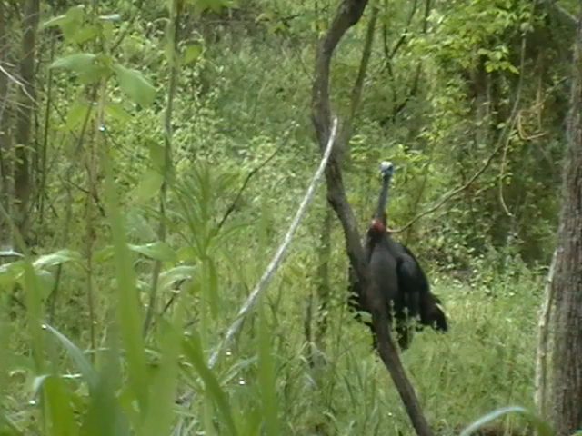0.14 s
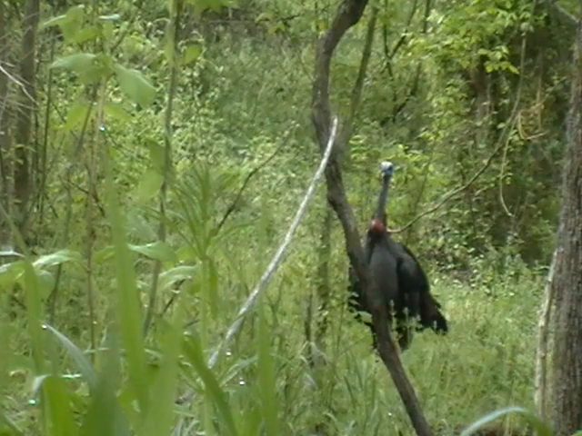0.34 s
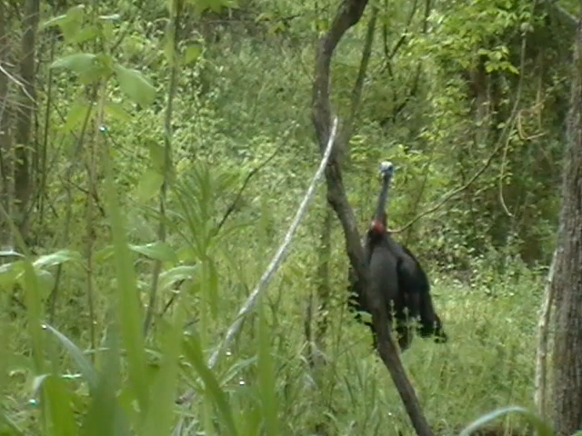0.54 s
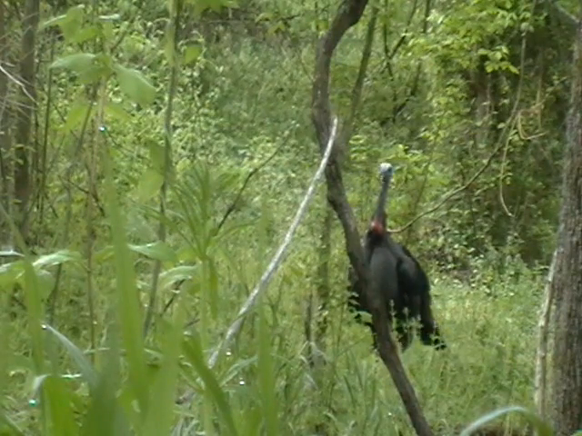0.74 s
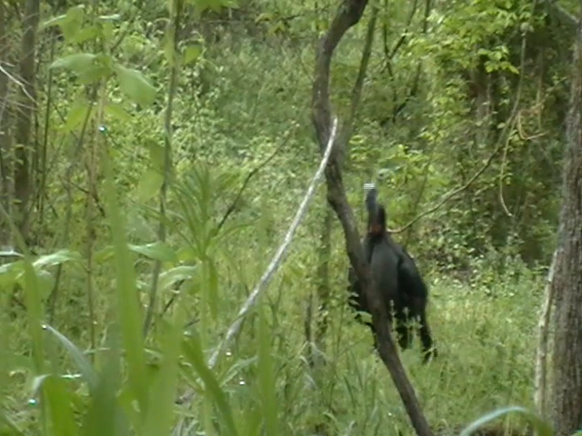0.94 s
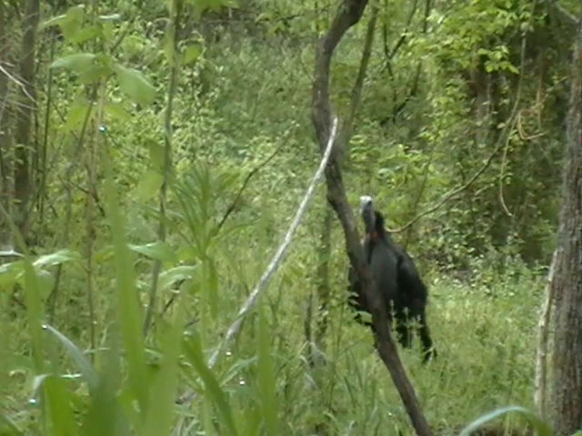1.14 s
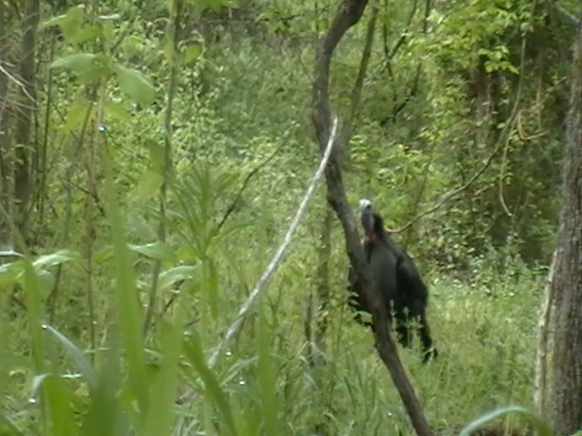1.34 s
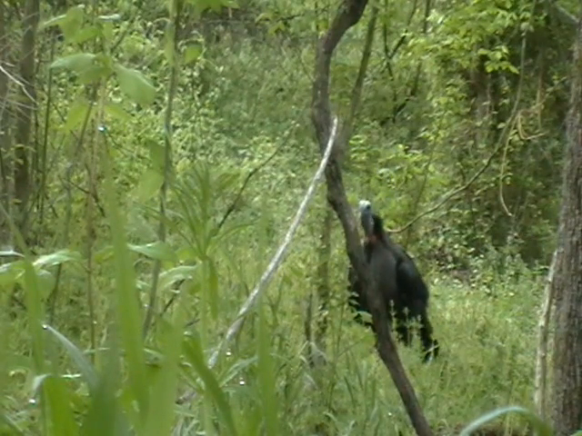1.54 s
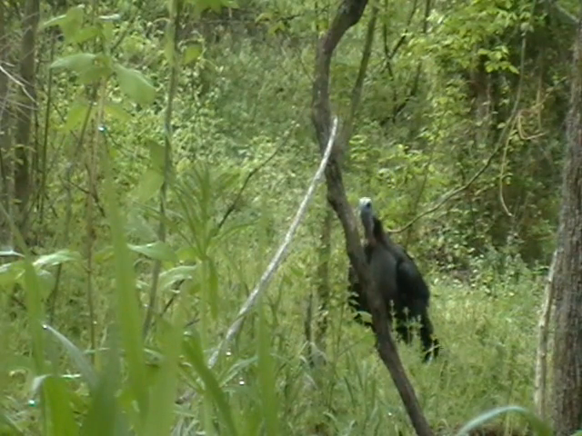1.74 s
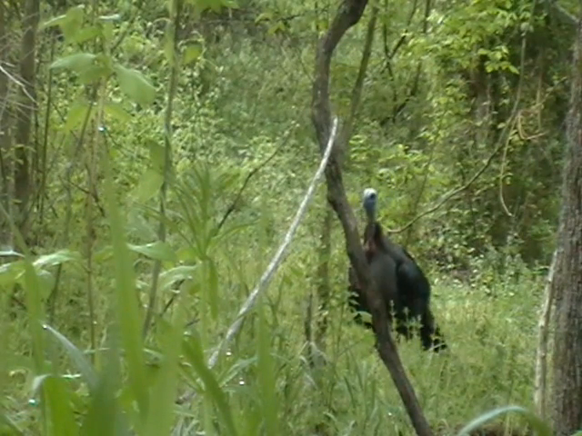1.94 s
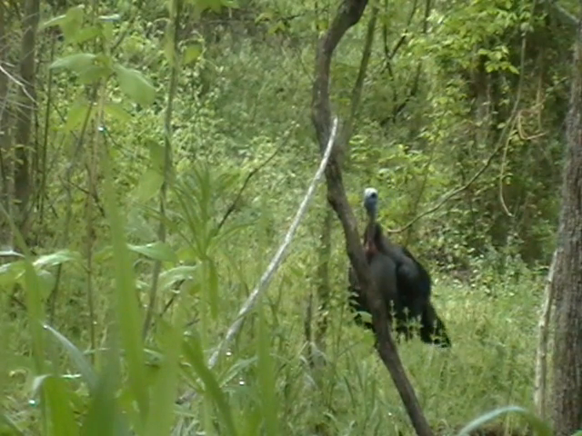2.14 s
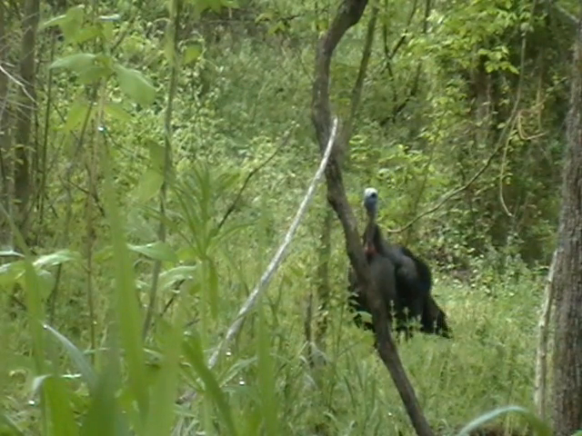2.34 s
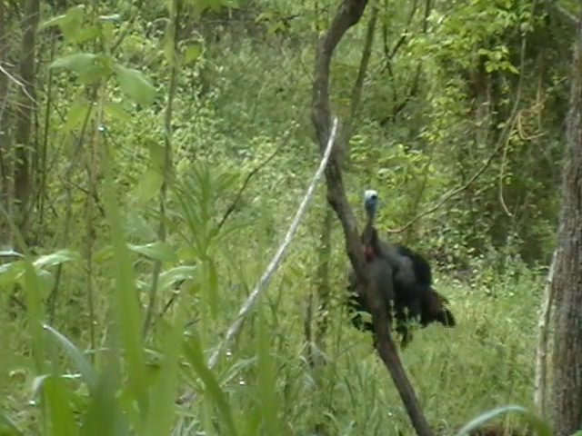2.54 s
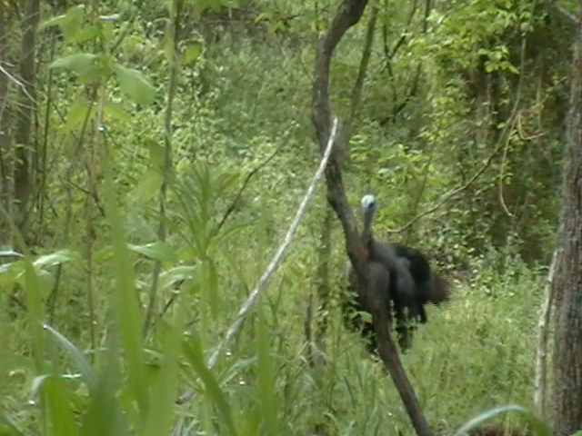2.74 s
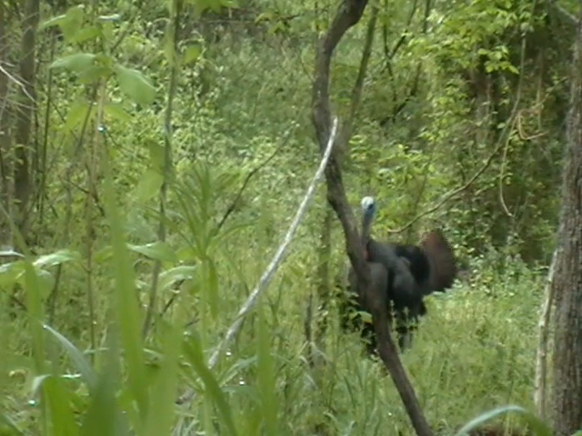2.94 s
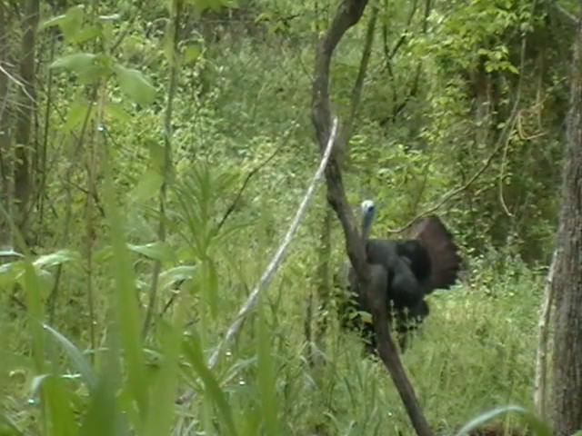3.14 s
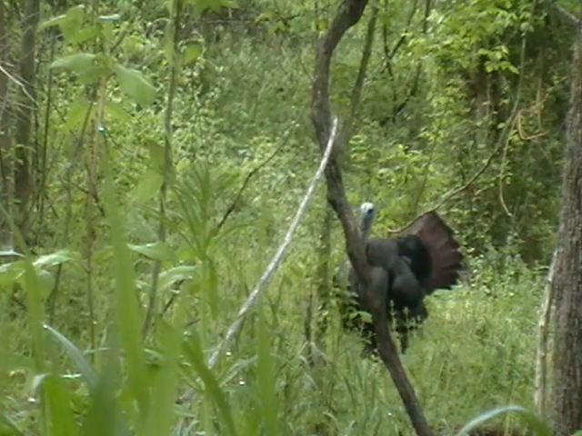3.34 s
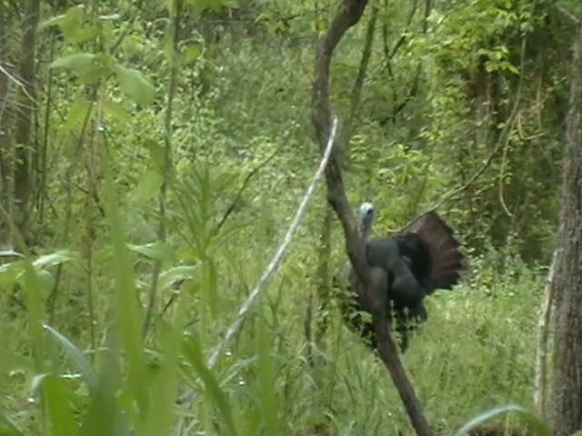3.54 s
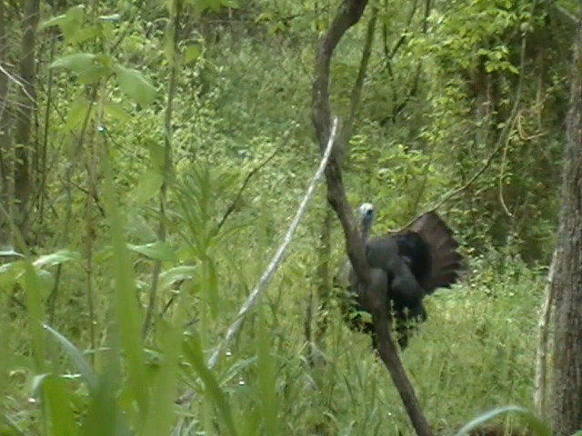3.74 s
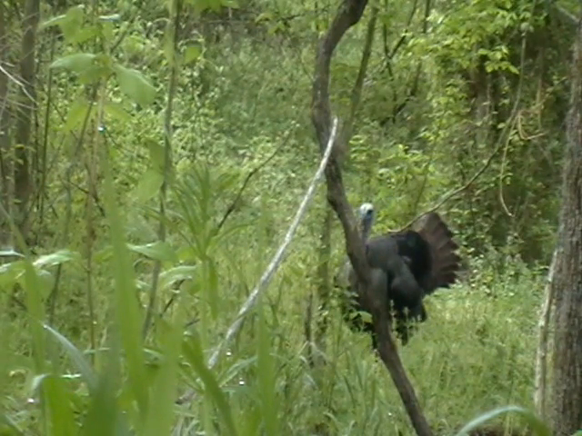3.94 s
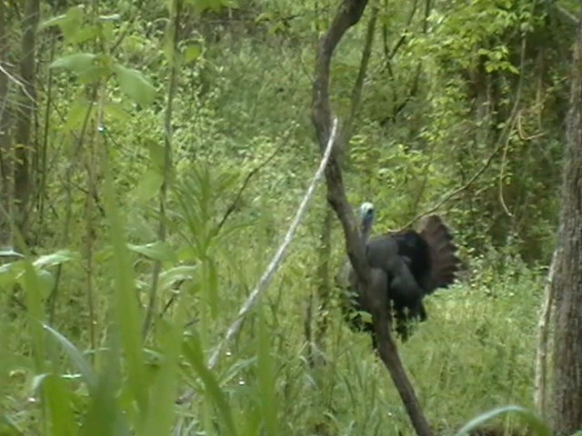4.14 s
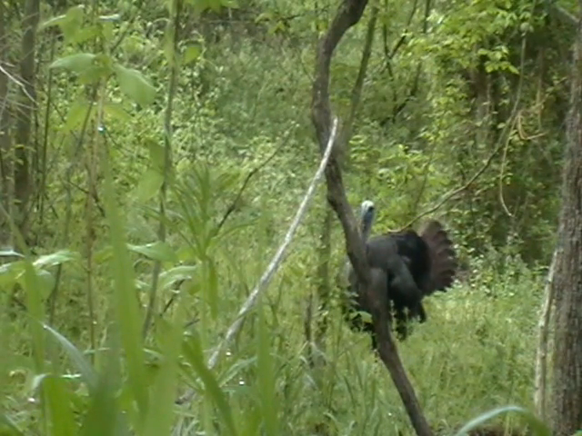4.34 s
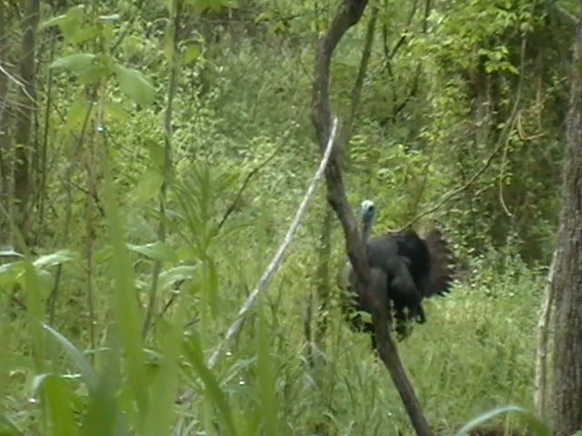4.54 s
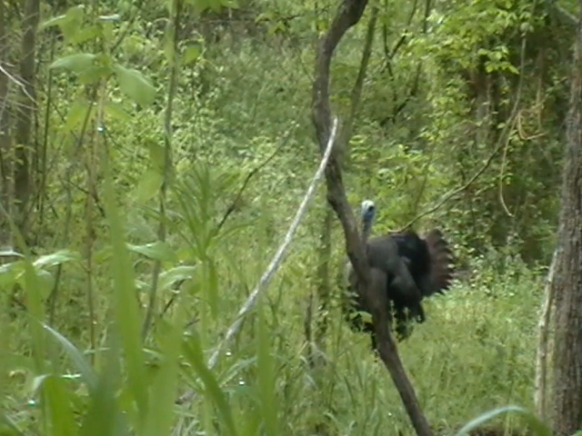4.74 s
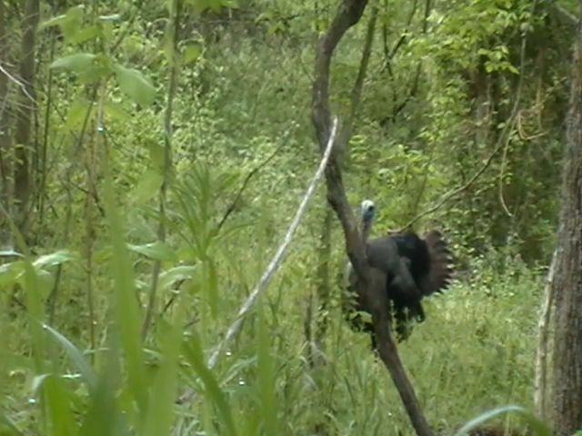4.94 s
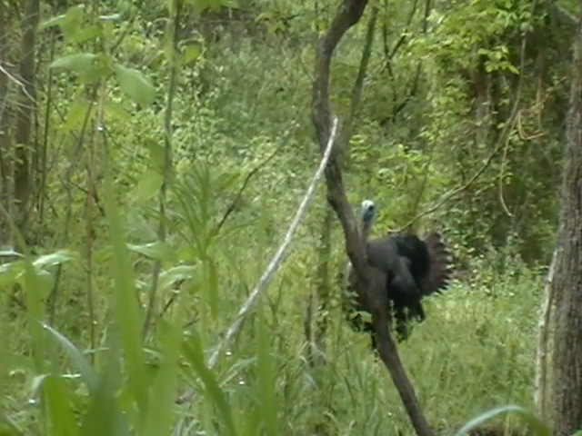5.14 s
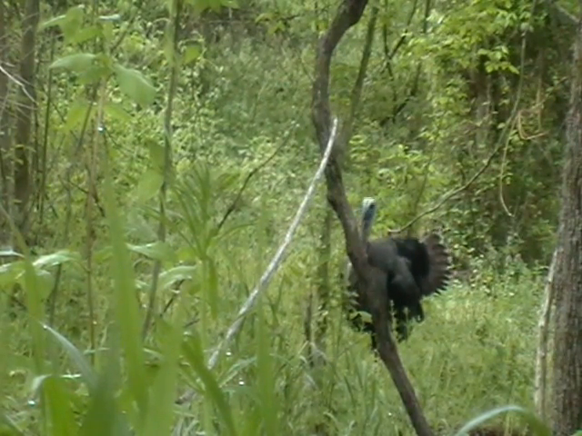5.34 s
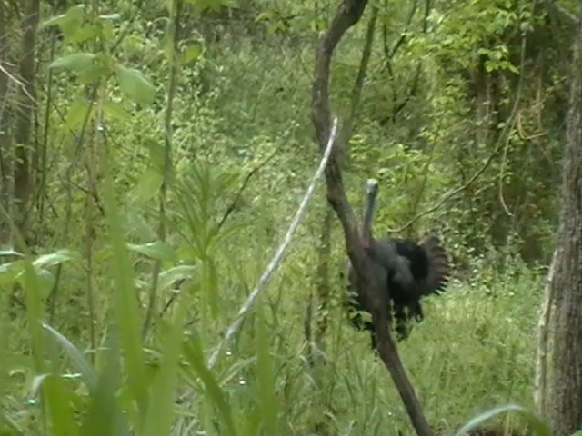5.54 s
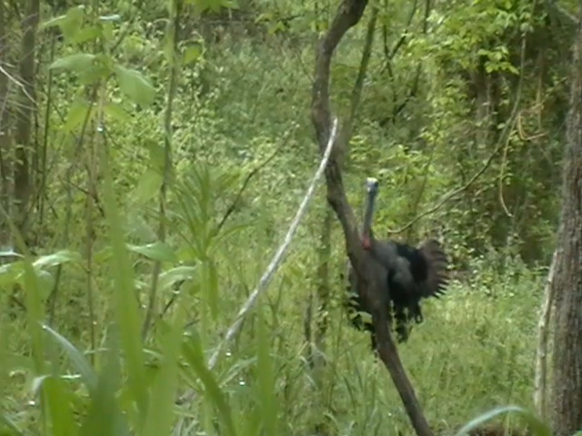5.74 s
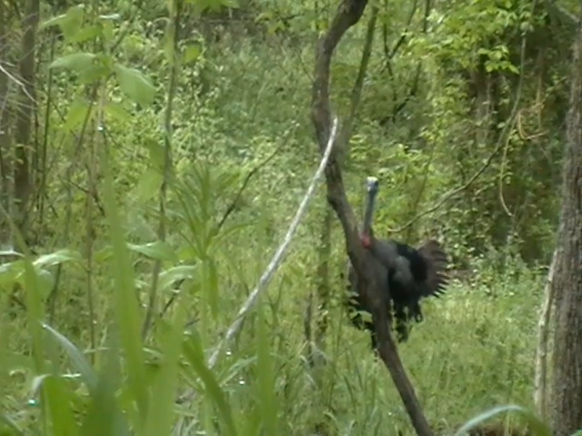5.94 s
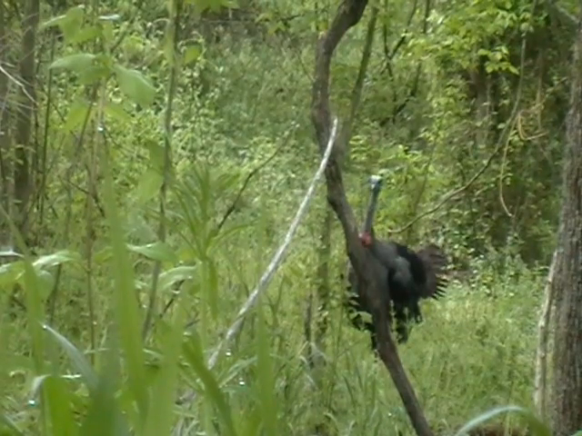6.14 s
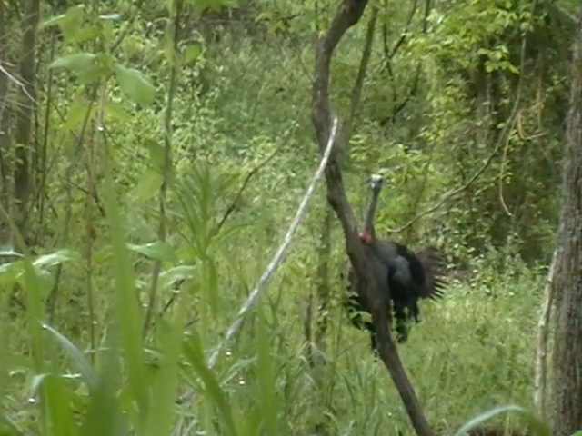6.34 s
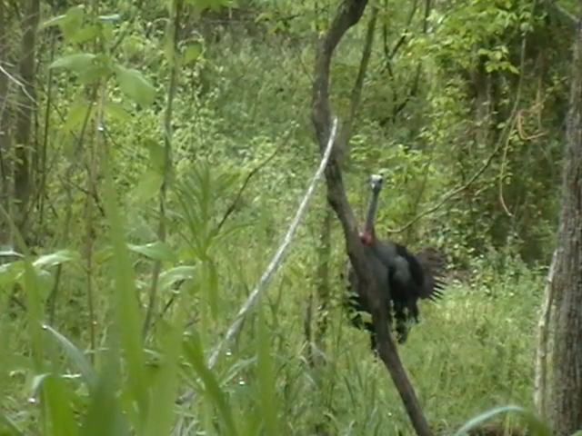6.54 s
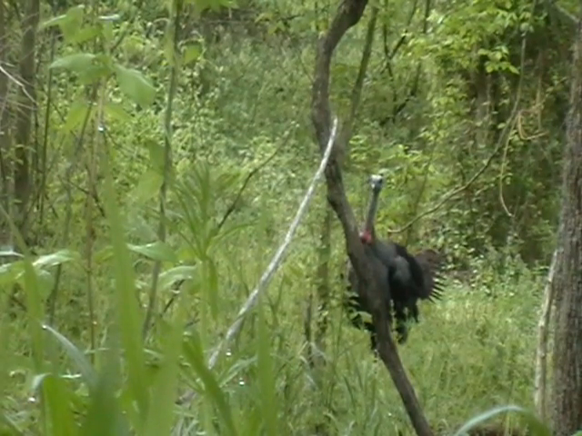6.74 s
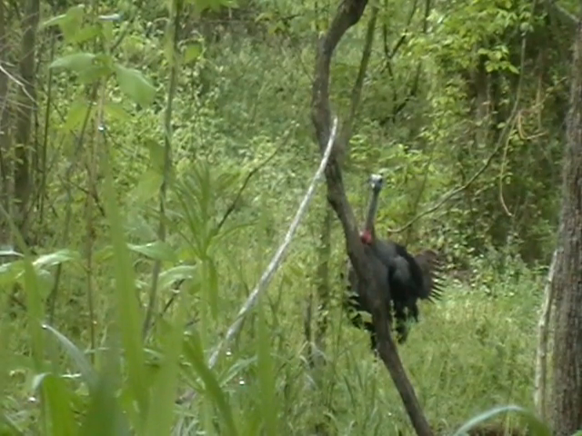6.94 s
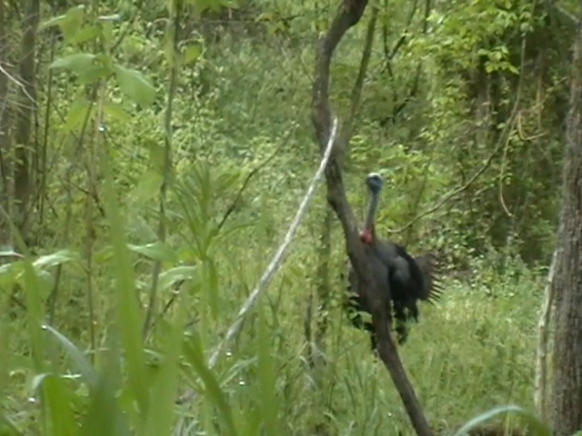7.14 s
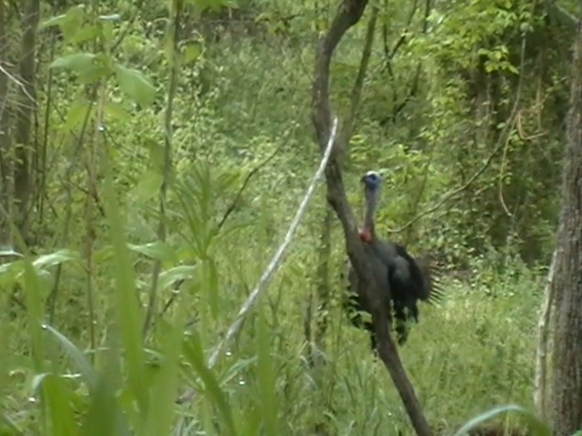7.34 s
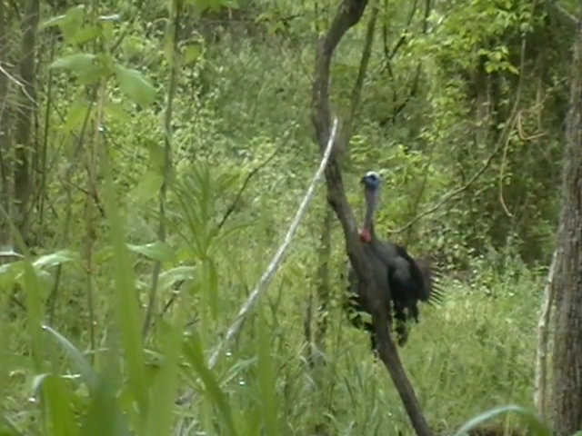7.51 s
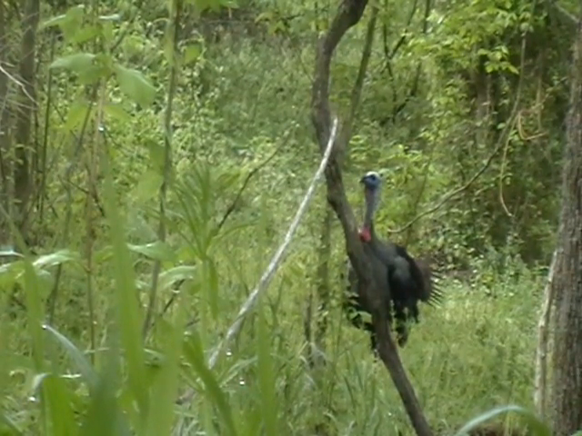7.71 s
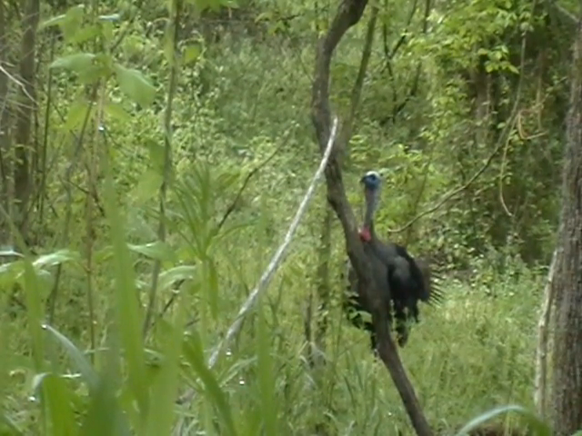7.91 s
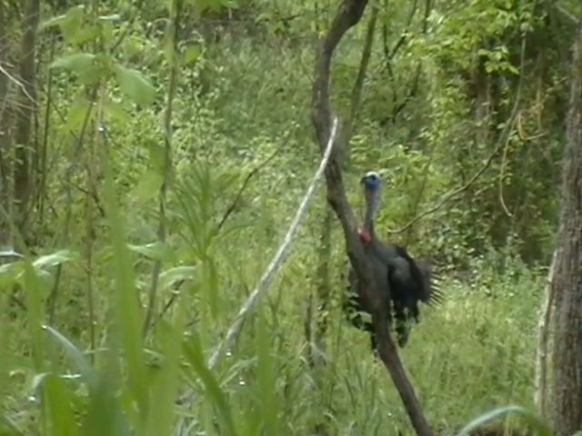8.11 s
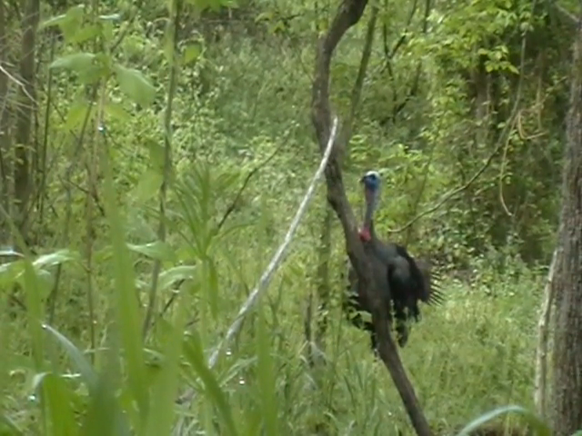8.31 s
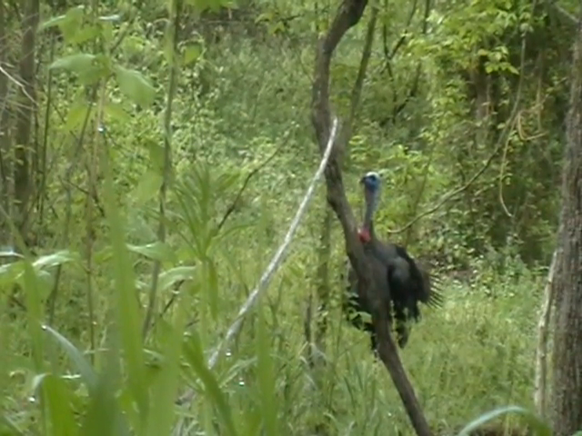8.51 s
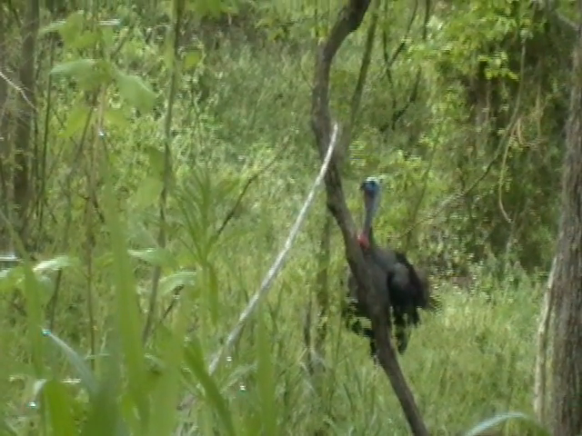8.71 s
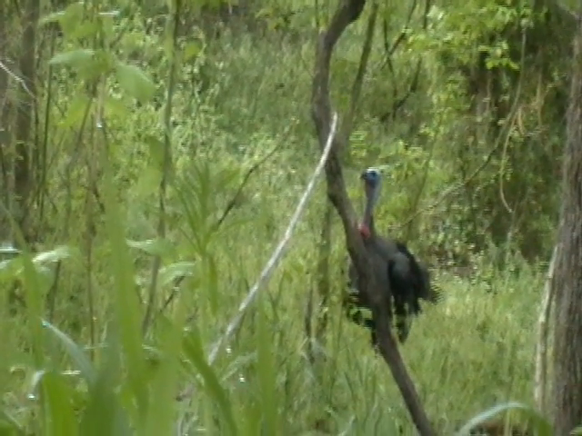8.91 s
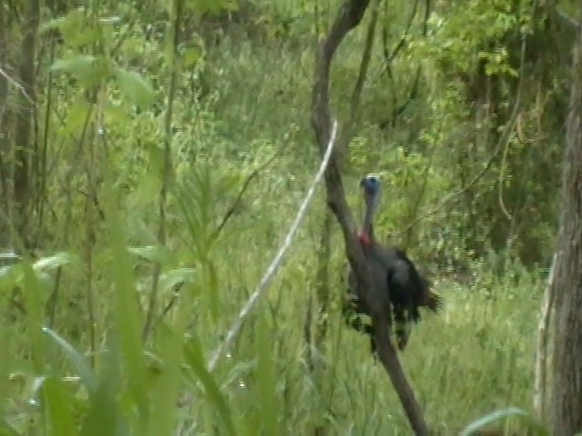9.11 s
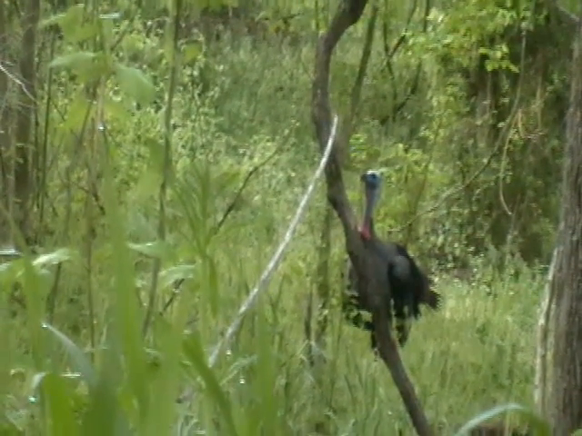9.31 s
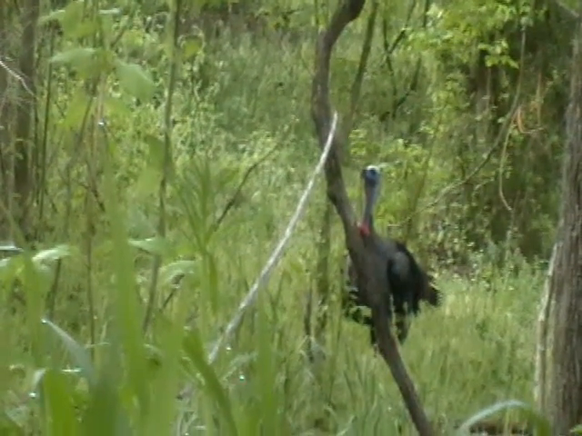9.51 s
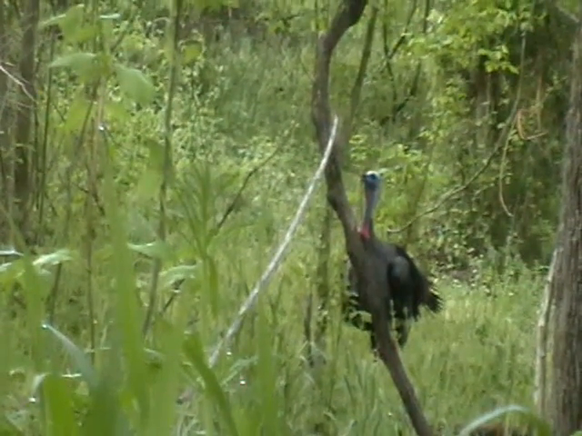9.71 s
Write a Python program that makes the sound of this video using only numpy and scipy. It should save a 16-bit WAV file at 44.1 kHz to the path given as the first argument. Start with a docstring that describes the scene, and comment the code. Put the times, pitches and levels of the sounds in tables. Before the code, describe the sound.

A wild turkey gobbles loudly once in leafy woodland, its rattle echoing off the trees, then faint small birds chirp and whistle over soft air.

```python
"""A small bird is heard first, already singing; a wild turkey soon gobbles in the woodland around it.
The gobble is a fluttering yelp, then a rattle of rasps: noisy pulses ringing a windpipe of resonances.
Other birds are bending tones, and chips and snaps are short bursts of filtered noise; the trees echo them.
Behind lie a soft rush of air and a blur of birds, both filtered noise, and a low distant hum of sines."""
import sys
import numpy as np
from scipy import signal
from scipy.fft import rfft, irfft, next_fast_len
from scipy.io import wavfile
from scipy.ndimage import map_coordinates

SR = 44100
rng = np.random.default_rng(int(sys.argv[2]) if len(sys.argv) > 2 else 0)


def digitize_waveform(pressure):
    """Quantize a signal to 16-bit integers and store it at the path in sys.argv[1].

    Rows of a 2-D input are taken as channels; values are limited to [-1, 1].
    """
    field = np.atleast_2d(pressure).T
    bounded = np.clip(field, -1, 1)
    quanta = np.round(bounded * 32767).astype(np.int16)
    wavfile.write(sys.argv[1], SR, quanta)


N = 430857

# rasping syllables of the gobble:
# (time [s], length [s], level [dB], strength of the tilt towards the treble [dB, weighted in turkey()])
SYLLABLES = [(0.908, 0.031, -25, 10.5), (0.956, 0.034, -22.5, 3), (1.033, 0.0214, -30.5, -8),
             (1.077, 0.031, -28, -2.5), (1.118, 0.0594, -23, 5), (1.174, 0.024, -22, 9.5),
             (1.249, 0.021, -27, -4), (1.292, 0.068, -23.5, 3), (1.35, 0.038, -22.5, 10),
             (1.435, 0.021, -27, 5), (1.461, 0.026, -28, 2), (1.561, 0.028, -27, 1),
             (1.623, 0.026, -30.5, 5), (1.667, 0.02, -30.5, -4), (1.754, 0.038, -29.5, 3.5),
             (1.825, 0.019, -30.5, -2), (1.864, 0.013, -31, -1)]
# moments when the voice locks into a tone on a windpipe resonance: (time [s], pitch [Hz], level [dB])
LOCKED_TONES = [(.964, 3735, -26.5), (.978, 3240, -25), (1.081, 1066, -24.5), (1.087, 1808, -26.5),
                (1.115, 1051, -27.5), (1.122, 3190, -26), (1.174, 3100, -25.5), (1.463, 1025, -30.5),
                (1.567, 3540, -32), (1.633, 3130, -37), (1.671, 3590, -34), (1.766, 3580, -31),
                (1.858, 1552, -38), (1.859, 3160, -35.5)]
LOCK_S, LOCK_FLUTTER = 0.021, 0.17  # length [s], depth of the flutter in level (share)


def turkey():
    """Rasping syllables ring the windpipe; between and within them the voice locks into fluttering tones."""
    voice, edge = np.zeros(N), .008
    for s, length, db, bright_db in SYLLABLES:
        stretch = np.clip((s - 1.25) / .55, 0, 1)  # the neck stretches during the gobble
        shake = 1 + .015 * rng.standard_normal()  # the shaking head detunes each syllable
        push = np.pad(gate(length, edge), (0, 512))  # room for the ringing to die away
        slaps = rasp(len(push), pulse_hz=590, jitter=.11, scatter_db=2.5, hiss=.2)
        source = foliage(push * slaps, share=0.64, span=0.009)

        def tract(hz):
            # the opening beak tilts the sound towards the upper resonances
            tilt = bright_db * along([(1000, -0.63), (3300, -0.15)], hz)
            return pipe(hz * shake, stretch) + tilt

        sound = unit(coloured(source, tract))
        add(voice, s - edge, amp(db) * sound * np.sqrt(np.mean(push ** 2)))
    add(voice, YELP[0][0], yelp())
    for s, hz, db in LOCKED_TONES:
        tone = slur(LOCK_S, (1.025 * hz, hz, hz), waver=.012, swell=1)
        add(voice, s, amp(db) * tone * (1 + LOCK_FLUTTER * flutter(len(tone))))
    return voice + amp(-9.5) * woods(voice, build=0.01, spread=0.18)


# the opening yelp leaps up, breaks and resumes lower:
# (time [s], level [dB, before YELP_GAIN_DB], pitch [Hz])
YELP = [(.894, -33, 1401), (.911, -18, 1379), (0.92, -13.5, 1618), (.93, -17, 1480), (.942, -18.5, 1359),
        (.951, -28, 1377), (.958, -21, 1208), (.969, -21, 1320), (.976, -32, 1260)]
YELP_GAIN_DB = -1.5
YELP_FLUTTER, YELP_SWING, YELP_SCATTER = 0.47, 0.03, .12  # flutter in level, in pitch; random waver (shares)


def yelp():
    """A loud tone that leaps up and falls back, fluttering in pitch and level."""
    s, db, hz = np.transpose(YELP)
    shape = gate(s[-1] - s[0] - .004, edge=.002)
    t = s[0] + np.arange(len(shape)) / SR
    beat = flutter(len(t))
    pitch = np.interp(t, s, hz) * (1 + YELP_SWING * beat + YELP_SCATTER * wobble(449, len(t)))
    tone = np.sqrt(2) * np.sin(2 * np.pi * np.cumsum(pitch) / SR)
    level = amp(YELP_GAIN_DB + np.interp(t, s, db))
    return shape * level * tone * (1 + YELP_FLUTTER * beat)


def flutter(size):
    """The quick, slightly uneven beat of the syrinx (the bird's voice box), roughly 213 Hz, -1 to 1."""
    rate_hz = 213.2 * (1 + .1 * wobble(94, size))
    return np.cos(2 * np.pi * np.cumsum(rate_hz) / SR)


def rasp(size, pulse_hz, jitter, scatter_db, hiss):
    """The syrinx slaps shut at uneven intervals and strengths, with air hissing through."""
    draws = rng.standard_normal((128, 2))
    times = (np.cumsum(np.exp(jitter * draws[:, 0])) * SR / pulse_hz).astype(int)
    pulses = np.bincount(times, amp(scatter_db * draws[:, 1]), size)[:size]
    return unit(pulses - pulses.mean()) + hiss * rng.standard_normal(size)


# broad colour of the rasp: (frequency [Hz], relative level [dB])
THROAT = [(40, -17), (200, -9), (500, -18.5), (800, -16.5), (1100, -13.5), (2000, -13), (3200, -6.5),
          (4500, -13.5), (5600, -21.5), (8000, -28.5), (15000, -38.5)]
# resonances of windpipe and beak, shifting as the neck stretches:
# (frequency at the start [Hz], frequency at the end [Hz], width [Hz], lift [dB])
PIPE_RESONANCES = [(700, 540, 25, -2), (1000, 884, 234, 19), (1380, 1500, 120, 6.5), (1757, 1540, 170, 14),
                   (2200, 2150, 400, 7), (3150, 3100, 44, 7), (3587, 3030, 130, 9.5), (4420, 4730, 460, 5)]


def pipe(hz, stretch):
    """Gain in dB of the windpipe and beak with the neck stretched by 0-1."""
    gain_db = along(THROAT, hz)
    for first, last, width, lift in PIPE_RESONANCES:
        centre = first + stretch * (last - first)
        gain_db = gain_db + lift / (1 + (2 * (hz - centre) / width) ** 2)
    return gain_db


def foliage(x, share, span):
    """Nearby leaves and stems add a dense cluster of early reflections, span seconds long."""
    u = np.linspace(0, 1, int(span * SR))
    taps = rng.standard_normal(len(u)) * np.sqrt(u) * (1 - u) ** 2
    return x + share * signal.fftconvolve(x, taps / np.linalg.norm(taps))[:len(x)]


# notes of the near songbird's phrase: (time into the phrase [s], length [s],
# first pitch [Hz], middle pitch [Hz], last pitch [Hz], level relative to the phrase [dB])
NEAR_PHRASE = [(-.045, .035, 2200, 2150, 2000, -20.5), (0, 0.079, 2990, 3490, 2580, -2.5),
               (.07, 0.032, 3980, 4080, 4540, 5), (.101, 0.041, 4436, 3350, 2305, -1),
               (.145, 0.048, 2080, 2280, 2650, -17)]
# its phrases: (time [s], level [dB])
NEAR_SONG = [(-.174, -39), (.145, -38.5), (.462, -39), (0.782, -39.5)]


def near_bird():
    """The nearest singer is already in full song, so its echo hangs in the trees from the start."""
    lead = SR // 2  # half a second is sung before the scene opens, then cut off
    starts = [(s + lead / SR, db) for s, db in NEAR_SONG]
    notes = song(NEAR_PHRASE, starts, waver=0.013)
    heard = notes + amp(0.5) * woods(notes, build=0.0035, spread=0.14)
    return np.pad(heard[:, lead:], ((0, 0), (0, lead)))


def songbirds():
    """Songs, slurs and whistles; each bird has its own share of direct sound and echo."""
    far, close, stray = far_warbler(), sparrow(), twitter(count=32)
    direct, scattered = calls()
    direct += amp(-3.0) * far + close + stray
    scattered += amp(2.5) * far + amp(-9) * close + amp(2) * stray + amp(4.0) * two_note_bird()
    return near_bird() + direct + woods(scattered, build=0.0026, spread=0.2)


# a sparrow's opening whistles, ever faster and higher:
# (time [s], pitch [Hz], level [dB, before a 1 dB cut])
SPARROW_WHISTLES = [(5.045, 3635, -55), (5.385, 3685, -52), (5.70, 3765, -48.5), (5.933, 3840, -51),
                    (6.099, 3940, -58), (6.247, 4060, -49.5), (6.357, 4150, -46), (6.45, 4300, -46.5)]
SUNG_SHARE = 0.73  # share of each beat that is sung
SAG, TILT_S = .014, 0.00292  # long whistles sink by a share of their pitch; quick ones rise by TILT_S over their beat


def sparrow():
    """Level whistles speed up like a bouncing ball and run into an even trill of upslurs."""
    track, (first, last) = np.zeros(N), (6.52, 7.47)  # first and last trill note [s]
    beats = np.diff([s for s, _, _ in SPARROW_WHISTLES] + [first])
    for (s, hz, db), beat in zip(SPARROW_WHISTLES, beats):
        rise = TILT_S / beat - SAG  # the quicker the note, the more it tilts upward
        pitches = hz * np.array([1 - rise, 1, 1 + rise])
        add(track, s, amp(db - 1) * slur(SUNG_SHARE * beat, pitches, waver=0.0064, swell=0.16))
    for s in np.linspace(first, last, 16):
        add(track, s, amp(-49) * slur(.048, (3980, 4740, 4950), waver=0.008, swell=1.0))
    return track


# Five kinds of single notes: (time [s], length [s], middle pitch [Hz], level [dB, before a 2 dB cut])
# rising slurs, same columns
RISES = [(3.9, 0.065, 5060, -56), (5.133, 0.072, 4900, -53), (5.597, .063, 4890, -53.5),
         (5.72, 0.084, 5140, -57), (5.941, 0.061, 4830, -52.5), (6.193, 0.06, 4960, -52),
         (6.457, 0.038, 4720, -50.5), (7.536, .046, 4400, -56), (7.958, 0.048, 4340, -49.5),
         (8.445, .06, 4140, -43), (8.766, 0.033, 5230, -47), (8.813, 0.064, 4310, -51.5),
         (8.93, 0.079, 4350, -50.5), (9.156, .052, 3080, -64), (9.222, .062, 3420, -57.5),
         (9.299, .079, 4300, -51), (9.426, 0.058, 4340, -52), (9.747, 0.022, 5330, -41.5)]
# falling slurs, same columns
FALLS = [(2.075, 0.087, 3800, -54.5), (3.843, 0.059, 3880, -52.5), (4.28, 0.055, 4000, -53.5),
         (4.465, .06, 3970, -54), (8.083, 0.041, 4670, -44.5), (8.119, 0.095, 3710, -54),
         (8.476, .04, 4150, -48), (8.562, 0.03, 4220, -46.5), (9.05, 0.042, 3560, -56),
         (9.53, 0.045, 3500, -53)]
# thin, buzzy notes that sag slightly, same columns
THIN_NOTES = [(3.39, 0.08, 6100, -63), (3.72, .096, 5950, -66), (4.641, 0.049, 5810, -52),
              (4.902, 0.17, 5600, -61), (5.347, .086, 6020, -58), (5.562, 0.04, 5760, -46),
              (5.792, 0.06, 5400, -57.5), (6.06, 0.047, 6940, -63), (6.362, 0.063, 5300, -55),
              (8.001, 0.097, 6270, -48), (8.39, 0.075, 5290, -47.5), (8.617, .073, 6000, -49)]
# level whistles, same columns; the first row is instead a brief ringing tink that opens the chip at 2.345 s
WHISTLED = [(2.34, 0.0042, 5730, -36), (4.096, 0.077, 2904, -55), (7.822, 0.092, 5775, -51.5),
            (8.352, 0.035, 5025, -41), (9.56, .2, 2790, -52.5)]
# low arched calls, same columns
ARCHES = [(.073, 0.078, 1210, -48.5), (.275, 0.063, 1170, -53), (2.177, 0.09, 1397, -55.5),
          (3.24, 0.095, 1343, -60.5), (4.866, 0.05, 1417, -55), (7.315, 0.095, 1487, -56),
          (7.648, 0.053, 1470, -56.5), (8.14, .097, 1485, -55.5), (8.5, 0.053, 1480, -58)]


def calls():
    """Single notes bend by the shape of their kind; returns their direct sound and what goes to the trees."""
    direct, scattered = np.zeros(N), np.zeros(N)
    # (notes, first pitch over middle, last pitch over middle, waver as a share, echo [dB])
    kinds = [(RISES, .88, 1.2, 0.008, 0),
             (FALLS, 1.3, .8, 0.0072, 2.1),
             (THIN_NOTES, 1.06, 0.93, .018, 2.1),
             (WHISTLED, 0.97, 1.003, 0.0041, -1.3),
             (ARCHES, 0.85, 0.81, .005, -4)]
    for notes, first, last, waver, echo_db in kinds:
        for s, length, hz, db in notes:
            note = amp(db - 2) * slur(length, (first * hz, hz, last * hz), waver, swell=0.38)
            add(direct, s, note)
            add(scattered, s, amp(echo_db) * note)
    return direct, scattered


# notes of the far warbler's phrase: (time into the phrase [s], length [s],
# first pitch [Hz], middle pitch [Hz], last pitch [Hz], level relative to the phrase [dB])
FAR_PHRASE = [(0, .1, 2550, 3020, 3860, -3), (.08, 0.043, 3780, 4000, 3730, 0),
              (.15, 0.054, 4550, 3720, 3100, 2), (.185, .04, 4320, 4430, 4620, 2),
              (.215, .1, 4400, 5250, 5350, 1), (.33, 0.1, 4730, 3750, 2974, 4)]
# its phrases: (time [s], level before the direct and echo gains [dB])
FAR_SONG = [(2.25, -54), (2.765, -51.5), (3.279, -52)]


def far_warbler():
    """A far warbler repeats a phrase of quick, bending notes."""
    return song(FAR_PHRASE, FAR_SONG, waver=0.012)


# notes of a song that seesaws between two pitches: (time into the phrase [s], length [s],
# first pitch [Hz], middle pitch [Hz], last pitch [Hz], level relative to the phrase [dB])
TWO_NOTE_PHRASE = [(0, 0.125, 2330, 2142, 2184, -0.7), (.1, 0.0887, 2300, 2507, 2630, -4),
                   (.19, .1, 2820, 2690, 2520, 3.5)]
# its phrases: (time [s], level before the echo gain [dB])
TWO_NOTE_SONG = [(5.18, -64), (5.47, -61), (5.76, -62), (6.05, -61), (6.34, -60), (6.63, -61), (6.91, -67)]


def two_note_bird():
    """A distant bird seesaws between two quavering pitches."""
    return song(TWO_NOTE_PHRASE, TWO_NOTE_SONG, waver=0.0305)


def twitter(count):
    """Faint notes, one in each equal slot after the gobble, slide up or down at random."""
    track, start = np.zeros(N), 2.1
    slot = (N / SR - start) / count
    for k, (when, pitch, slide, level) in enumerate(rng.uniform(-1, 1, (count, 4))):
        pitches = 4900 * 2 ** (.4 * pitch + 0.18 * slide * np.array([-1, 0, 1]))  # [Hz]
        note = amp(-60.5 + 3 * level) * slur(.06, pitches, waver=.012, swell=0.52)
        add(track, start + (k + (1 + when) / 2) * slot, note)
    return track


def song(phrase, starts, waver):
    """A bird repeats one phrase of quavering notes."""
    track = np.zeros(N)
    for start, phrase_db in starts:
        for s, length, *pitches, db in phrase:
            add(track, start + s, amp(phrase_db + db) * slur(length, pitches, waver, swell=.55))
    return track


# harsh high chips: (time [s], level [dB])
CHIPS = [(.197, -48), (2.345, -47.5), (2.893, -50.5), (4.497, -46), (6.1, -46), (7.638, -48), (8.77, -46)]
# lower, hoarse chucks: (time [s], level [dB])
CHUCKS = [(2.349, -50), (5.898, -47.5), (7.98, -45)]
# twig snaps: (time [s], level [dB])
SNAPS = [(.207, -37), (.485, -37), (2.123, -55), (8.691, -40), (8.729, -38)]


def chips():
    """Short noisy bursts that start hard and sag, each kind around its own pitch."""
    track = np.zeros(N)
    buzz = [(7.728 + k / 105, -39) for k in range(4)]  # four quick pulses, 105 a second
    knock, lisp = [(3.19, -56.5)], [(7.12, -61)]  # a soft knock on wood, a very high lisp
    # (events, length [s], centre [Hz], width [octaves], fall in level over the burst [dB])
    kinds = [(CHIPS, 0.035, 5130, 0.36, 2.8),
             (CHUCKS, .019, 2540, 0.79, 1.5),
             (SNAPS, 0.0024, 3130, 1.14, 3),
             (buzz, 0.0042, 4430, 0.26, 3),
             (knock, .014, 670, 0.7, 4),
             (lisp, 0.097, 8140, 0.16, 3)]
    for events, length, centre, width, fall_db in kinds:
        shape = gate(length, edge=0.0019)
        shape = shape * amp(fall_db * np.linspace(.5, -.5, len(shape)))
        band = lambda hz: np.maximum(-6 * (np.log2((hz + 1) / centre) / width) ** 2, -26)
        for s, db in events:
            burst = unit(coloured(rng.standard_normal(len(shape)), band))
            add(track, s - .0015, amp(db) * shape * burst)
    return track + amp(-1.5) * woods(track, build=0.0019, spread=0.18)


# how long the woods ring: (frequency [Hz], time to fall by 60 dB [s])
WOODS_RING = [(200, 1.5), (620, 2.5), (900, 1.97), (1250, 0.85), (1550, 0.57), (2000, 0.83), (3200, 0.68),
              (6000, 0.7), (14000, 0.42)]


def woods(x, build, spread):
    """Trunks and leaves scatter the sound into a tail that builds up, then dies at its own pace per pitch."""
    hz, t, z = signal.stft(rng.standard_normal((2, SR)), SR, nperseg=256)
    decay = amp(-60 * t / along(WOODS_RING, hz)[:, None]) * (1 - np.exp(-t / build))
    mid, side = signal.istft(z * decay, SR, nperseg=256)[1]
    tail = np.array([mid + spread * side, mid - spread * side]) / np.linalg.norm(mid)
    return signal.fftconvolve(x[None], tail * amp(-1.0), axes=1)[:, :N]


def background():
    """Air in the trees, a very distant whistler, a blur of song and a slowly wavering hum."""
    return air() + whistler() + blur() + hum()


# bouts of a very distant whistler: (time [s], length [s], level before its waver [dB])
WHISTLER_BOUTS = [(2, 0.56, -62.5), (4, 1.12, -63), (5.9, 1.06, -61.5), (8.4, 0.78, -62.5)]


def whistler():
    """Noise in a narrow band near 2440 Hz comes and goes in wavering bouts."""
    bouts, fade = np.zeros(N), .08
    for s, length, db in WHISTLER_BOUTS:
        add(bouts, s - fade, amp(db) * gate(length, fade))
    band = noise_band([(1900, -40), (2330, -8), (2440, 10), (2560, -6), (3200, -34.5)])
    return band * bouts * amp(2.46 * wobble(8))


# blur of many far birds: (time [s], level before its waver [dB])
BLUR_LEVEL = [(0, -70), (2.1, -76), (2.6, -59.5), (3.7, -59.5), (4.2, -63), (5.8, -57.5), (7.4, -64),
              (8.2, -56.5), (9.7, -67)]


def blur():
    """Many far birds merge into a wavering band of treble noise."""
    band = noise_band([(1500, -37), (2900, -1.5), (4200, 2), (5800, -9.5), (7500, -12.5), (15000, -29.5)])
    return band * amp(curve(BLUR_LEVEL)) * amp(1.6 * wobble(10))


# colour of the air, held from 1800 Hz up: (frequency [Hz], relative level [dB])
AIR_COLOUR = [(15, -27), (25, -52), (54, -1.5), (151, -3.5), (326, -10), (586, -9), (771, -9.5),
              (1410, -13.5), (1660, -14.5), (2000, -16), (2600, -48), (4400, -120)]
# fall of the air's treble, added to that colour: (frequency [Hz], relative level [dB])
AIR_TOP = [(2000, 2), (5000, -1), (8000, -11), (15500, -15.5)]
# likeness of left and right, kept within 0-0.995: (frequency [Hz], likeness)
ALIKE = [(60, 0.99), (150, 0.94), (380, 0.57), (950, 0.51), (2380, 0.36), (5980, 0.88), (15000, 1)]
# soft gusts: (time [s], half-width [s], lift [dB])
GUSTS = [(.15, 0.82, 2.6), (3.55, 0.81, 1.7)]


def air():
    """Moving air is coloured noise with slow gusts; how alike left and right are depends on pitch."""
    t = np.arange(N) / SR
    colour = lambda hz: along(AIR_COLOUR, np.minimum(hz, 1800)) + along(AIR_TOP, hz)
    noise = coloured(rng.standard_normal((2, N)), colour)
    # level of the left-right difference that gives the wanted likeness
    side_db = lambda hz: 10 * np.log10(2 / (1 + np.clip(along(ALIKE, hz), 0, .995)) - 1)
    side = coloured(noise[1], side_db)
    gust_db = sum(db * np.exp(-((t - s) / width) ** 2) for s, width, db in GUSTS)
    rush = unit(np.array([noise[0] + side, noise[0] - side]))
    return rush * amp(-57 + gust_db) * amp(.6 * wobble(5))


# steady tones of the hum: (frequency [Hz], level [dB, before a 1.5 dB lift, waver and swell])
HUM_TONES = [(64.6, -68), (140.0, -65.5), (161.5, -64.5), (220.7, -71.5)]
# slow swell of the whole hum: (time [s], level change [dB])
HUM_SWELL = [(0, -5), (2.5, 0), (5.5, 0), (6.2, 3.5), (8.4, 2.5), (9.7, -2.5)]


def hum():
    """Low sine tones waver slowly in level and phase."""
    t = np.arange(N) / SR
    total = np.zeros(N)
    for hz, db in HUM_TONES:
        level = amp(db + 1.5 + 2.6 * wobble(2.04))
        total += level * np.sin(2 * np.pi * hz * t + 0.99 * wobble(6.1))
    return amp(curve(HUM_SWELL)) * total


def slur(length, pitches, waver, swell):
    """A tone that bends through three pitches; swell 1 rises slowly, less is flatter."""
    u = np.linspace(0, 1, int(length * SR))
    bend = np.polyval(np.polyfit([0, .5, 1], pitches, 2), u)
    hz = bend * (1 + waver * wobble(396, len(u)))
    return np.sqrt(2) * np.abs(np.sin(np.pi * u)) ** swell * np.sin(2 * np.pi * np.cumsum(hz) / SR)


def gate(length, edge):
    """A flat envelope with smooth flanks, centred on edge and edge + length."""
    t = np.arange(int((length + 2 * edge) * SR)) / SR
    flank = lambda u: np.sin(np.pi / 2 * np.clip(u / (2 * edge), 0, 1)) ** 2
    return flank(t) * flank(length + 2 * edge - t)


def noise_band(points):
    """Noise of rms 1, coloured by (frequency [Hz], relative level [dB]) points."""
    return unit(coloured(rng.standard_normal(N), lambda hz: along(points, hz)))


def coloured(x, gain_db):
    """Filter by a dB function of frequency; minimum phase, so nothing sounds before its cause."""
    size = x.shape[-1]
    m = 2 * next_fast_len(size // 2 + 2048)
    cepstrum = irfft(np.log(amp(gain_db(np.fft.rfftfreq(m, 1 / SR))) + 1e-6))
    cepstrum[1:m // 2] *= 2
    cepstrum[m // 2 + 1:] = 0
    return irfft(rfft(x, m) * np.exp(rfft(cepstrum)), m)[..., :size]


def wobble(rate, size=N):
    """A smooth random curve, rate knots a second."""
    knots = rng.standard_normal(int(size * rate / SR) + 4)
    return map_coordinates(knots, [np.arange(size) * rate / SR])


def along(points, hz):
    """Read (frequency [Hz], value) points on a log axis."""
    f, v = np.transpose(points)
    return np.interp(np.log(hz + 1), np.log(f + 1), v)


def curve(rows):
    """Turn (time [s], value) rows into one value per sample."""
    return np.interp(np.arange(N) / SR, *np.transpose(rows))


def amp(db):
    """Decibels to gain."""
    return 10 ** (np.asarray(db) / 20)


def unit(x):
    """Scale to rms 1."""
    return x / np.sqrt(np.mean(x ** 2) + 1e-20)


def add(track, s, x):
    """Mix x into track at time s."""
    i = round(s * SR)
    x = x[max(-i, 0):max(N - i, 0)]
    track[max(i, 0):max(i, 0) + len(x)] += x


def scene():
    """Direct sounds sit in the middle; the echoes and the air differ between left and right."""
    return turkey() + songbirds() + chips() + background()


def record(dry):
    """Adds faint copies of the treble, shifted up by 4 and 8 kHz, and keeps nothing from 15.8 kHz up."""
    m = next_fast_len(N + SR // 2)
    hz = np.fft.rfftfreq(m, 1 / SR)
    treble = irfft(rfft(dry, m) * amp(along([(1500, -14), (3000, 0)], hz)), m)
    treble = signal.hilbert(treble)[:, :N]
    turn = np.exp(2j * np.pi * 4000 * np.arange(N) / SR)  # shifts every frequency up by 4 kHz
    images = np.real(treble * (amp(-25) * turn + amp(-30) * turn ** 2))
    return irfft(rfft(dry + images, m) * (hz < 15800), m)[:, :N]


dry = scene()
out = record(dry)
digitize_waveform(out)
```